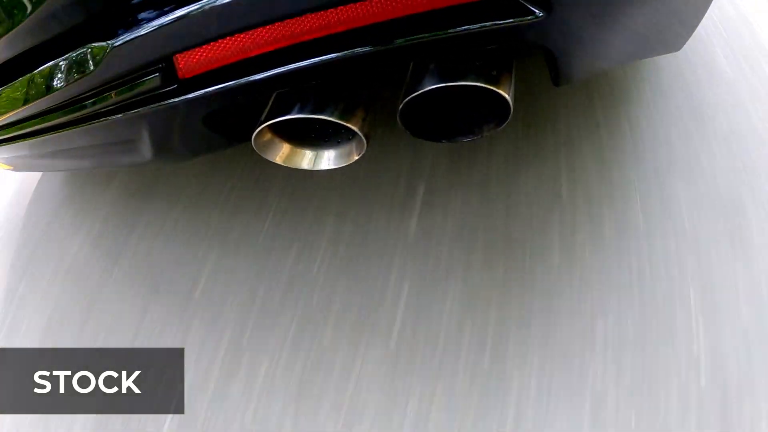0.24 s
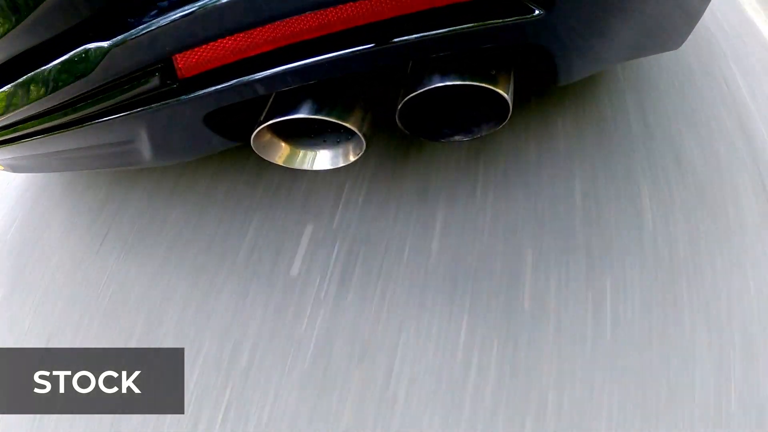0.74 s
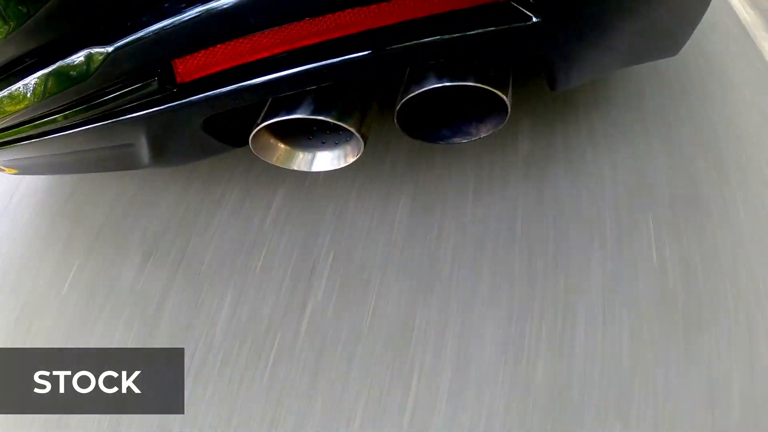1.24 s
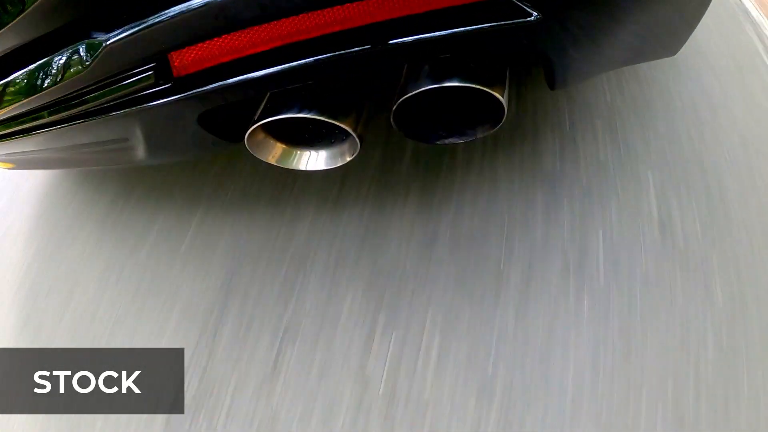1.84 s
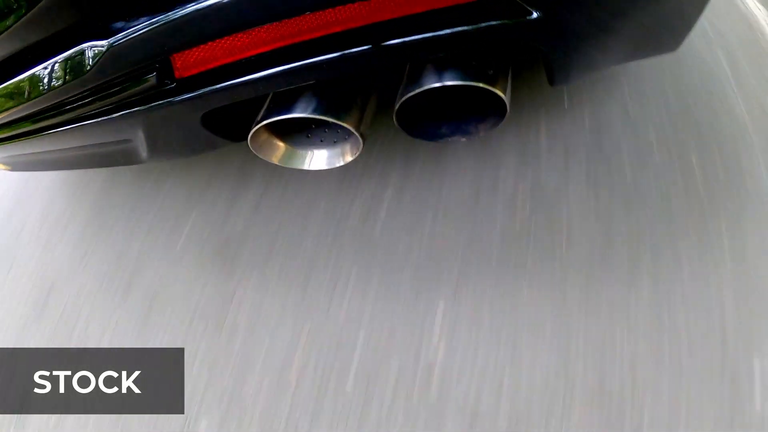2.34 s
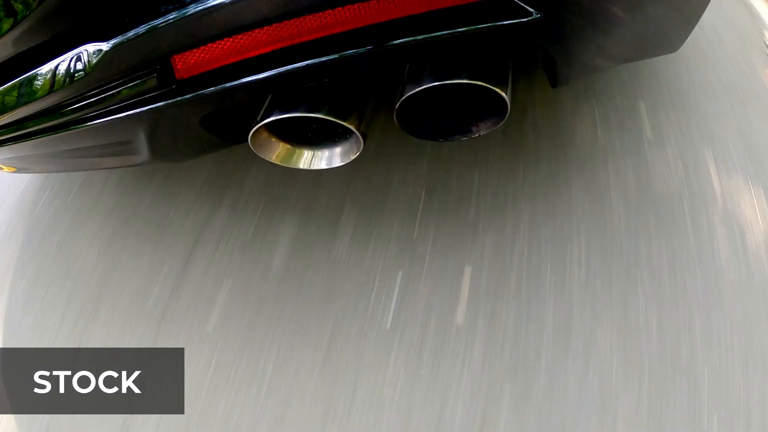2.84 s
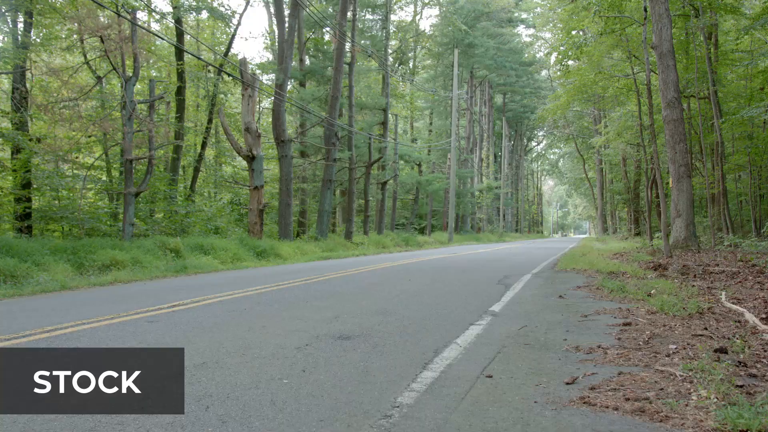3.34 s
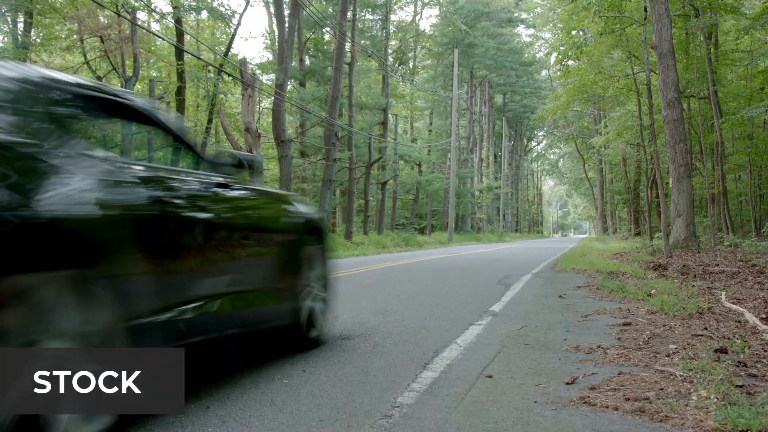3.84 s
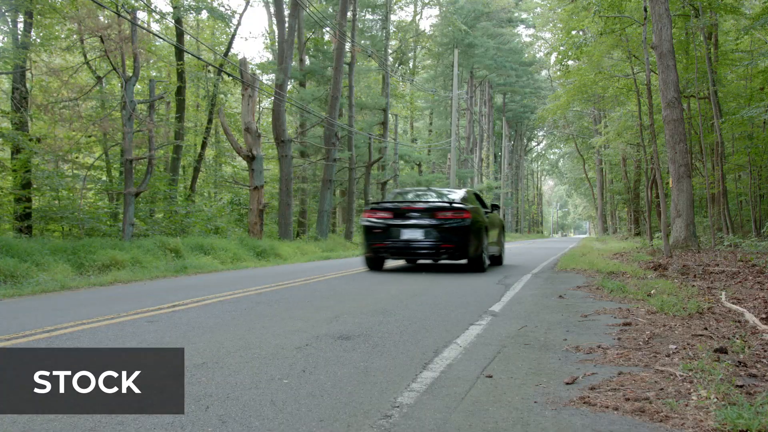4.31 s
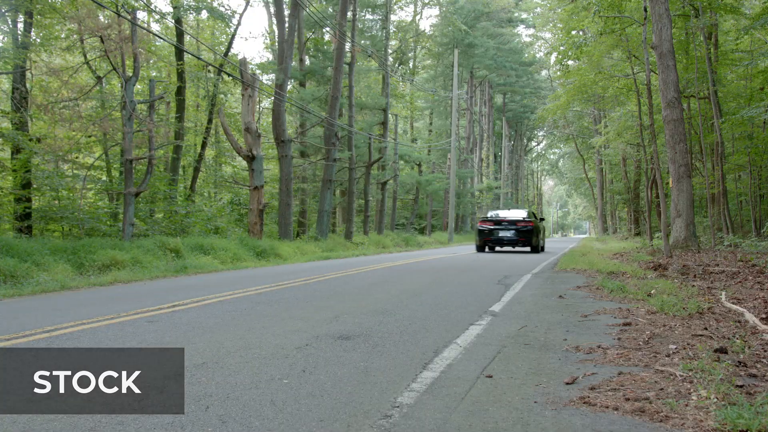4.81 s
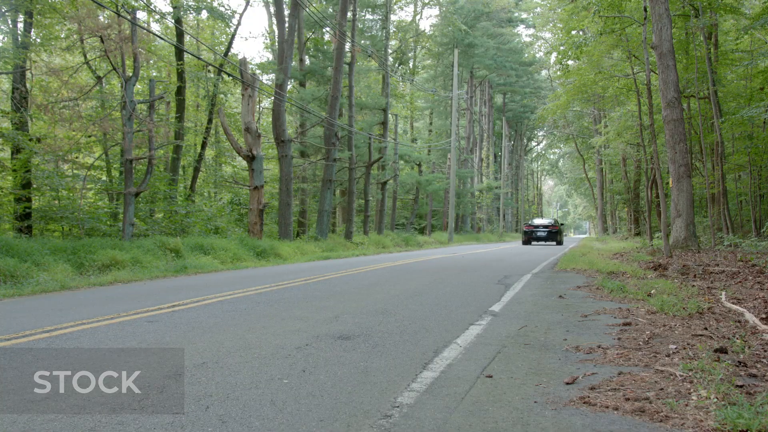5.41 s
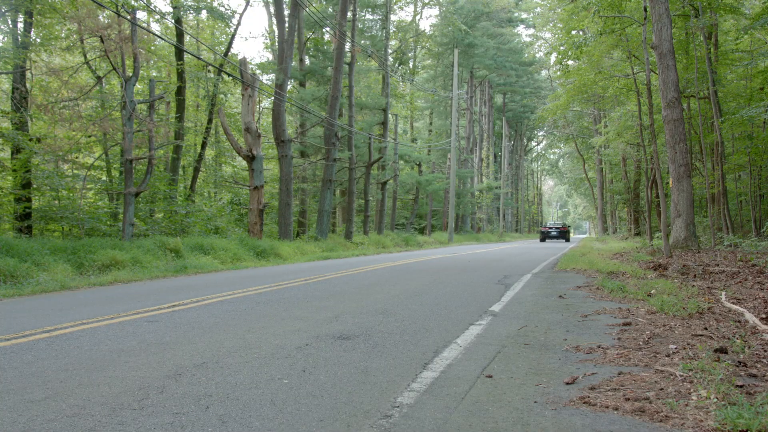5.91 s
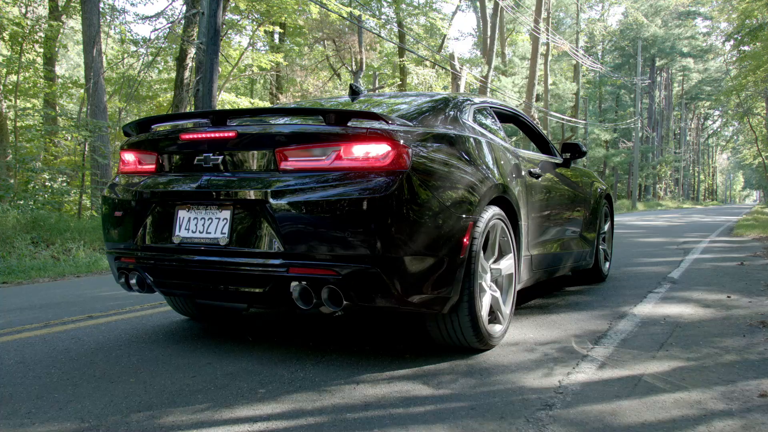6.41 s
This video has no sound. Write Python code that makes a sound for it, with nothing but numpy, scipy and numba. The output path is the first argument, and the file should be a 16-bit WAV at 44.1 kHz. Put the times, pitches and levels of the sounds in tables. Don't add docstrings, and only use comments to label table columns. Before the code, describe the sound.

A V8 sports car roars at its tailpipes through a gear change, then blasts past on a wooded road, shifts, recedes, and cuts to idle.

```python
import sys
import numpy as np
from scipy import signal
from scipy.fft import rfft, irfft, next_fast_len
from scipy.io import wavfile
from scipy.ndimage import uniform_filter1d
from numba import njit

SR = 44100
rng = np.random.default_rng(int(sys.argv[2]) if len(sys.argv) > 2 else 0)


def put_to_file(sound):
    columns = np.atleast_2d(sound).T
    safe = np.clip(columns, -1, 1)
    whole_steps = np.round(safe * 32767)
    wavfile.write(sys.argv[1], SR, whole_steps.astype(np.int16))


def makeup_ratio(level_db):
    decades = np.asarray(level_db, float) / 20
    return 10 ** decades


N = 293706


def coloured(spectrum, x=None):
    x = rng.standard_normal(N) if x is None else x
    size = next_fast_len(len(x), real=True)
    hz, db = np.transpose(spectrum)
    bin_hz = np.arange(size // 2 + 1) * SR / size
    gain = makeup_ratio(np.interp(np.log(bin_hz + 1), np.log(hz), db, left=-90, right=-90))
    y = irfft(rfft(x, size) * gain, size)[:len(x)]
    return y / np.std(y)


def even(x):
    power = uniform_filter1d(uniform_filter1d(x ** 2, size=4000), size=4000)
    return x / np.sqrt(power + 1e-12)


def walk(rate_hz):
    hold = int(SR / rate_hz)
    steps = np.repeat(rng.standard_normal(N // hold + 1), hold)
    return uniform_filter1d(uniform_filter1d(steps, hold), hold)[:N]


def low_pass(x, hz, order=2):
    return signal.sosfilt(signal.butter(order, hz, fs=SR, output="sos"), x)


def high_pass(x, hz, order):
    return signal.sosfilt(signal.butter(order, hz, "high", fs=SR, output="sos"), x)


@njit
def resonator(x, hz, width):
    y, band, low = np.empty(len(x)), 0., 0.
    for i in range(len(x)):
        g, k = np.pi * hz[i] / SR, width[i] / hz[i]
        v = (band + g * (x[i] - low)) / (1 + g * (g + k))
        band, low, y[i] = 2 * v - band, low + 2 * g * v, k * v
    return y


def curves(table, on=slice(0, N)):
    s, *columns = np.transpose(table)
    return [np.interp(np.arange(N)[on] / SR, s, c) for c in columns]


def during(table):
    t = np.arange(N) / SR
    fade_in = np.clip((t - table[0][0]) * 9000 + 1, 0, 1)
    return fade_in * np.clip((table[-1][0] - t) * 9000 + 1, 0, 1)


def peak(s, db, rise_s, fall_s):
    t = np.arange(N) / SR - s
    return makeup_ratio(db - 10 * np.maximum(-t / rise_s, t / fall_s))


def tails(pulses, seconds):
    return even(signal.lfilter([1], [1, -np.exp(-1 / (seconds * SR))], pulses))


# off_s, closing_s, on_s, opening_s, depth (0-1)
FOOT_LIFTS = [
    (.78, .16, 1.42, .26, 1),
    (5.8, .15, 6.44, .01, .6),
]
# centre_s, added_scatter_db, half_length_s
STUMBLES = [
    (.97, .8, .12),
    (1.41, 3.4, .07),
    (3.7, .8, .45),
    (3.98, 2.2, .09),
    (6.1, 1.6, .34),
]


def foot(on):
    t = np.arange(N)[on] / SR
    throttle = np.ones(len(t))
    for off_s, closing_s, on_s, opening_s, depth in FOOT_LIFTS:
        closing = np.clip((t - off_s) / closing_s, 0, 1)
        throttle = throttle - depth * closing * np.clip(1 - (t - on_s) / opening_s, 0, 1)
    scatter_db = 0.45 + 1.1 * (1 - throttle) + 2.0 * (t > AT_IDLE[0][0])
    for s, db, half_s in STUMBLES:
        scatter_db = scatter_db + db * np.clip(1 - np.abs(t - s) / half_s, 0, 1)
    turbulence_db = -16 + 16.5 * np.log10(scatter_db)
    return throttle, scatter_db, turbulence_db


def firings(hz, cylinders, scatter_db, bias=1, twin_db=0):
    count = len(cylinders)
    crank = np.cumsum(count * hz / SR)
    firing = np.arange(1, int(crank[-1]))
    strength_db, lag = np.array(cylinders)[firing % count].T
    chance = rng.standard_normal(N // 50)[firing]
    at = np.interp(firing + lag, crank, np.arange(len(hz)))
    i = np.clip(at.astype(int), 0, len(hz) - 2)
    other_bank = firing % count == count // 2
    size_db = bias * strength_db + scatter_db[i] * chance
    size = makeup_ratio(size_db + (twin_db + 0 * hz)[i] * other_bank)
    return np.bincount(i, size * (i + 1 - at), len(hz)) + np.bincount(i + 1, size * (at - i), len(hz))


HOT_STRETCH = 1.012


def exhaust(pulses, pipe, stretch, turbulence_db, upper=1):
    drive = even(pulses - uniform_filter1d(pulses, size=8000))
    drive = drive + 2 * makeup_ratio(turbulence_db) * rng.standard_normal(len(pulses))
    hot = np.minimum(stretch, HOT_STRETCH)
    ring = 0
    for hz, width_hz, gain in pipe:
        if hz > 600:
            ring = ring + gain * upper * resonator(drive, hz * hot, abs(width_hz) * hot)
        else:
            ring = ring + gain * resonator(drive, hz * stretch, abs(width_hz) * stretch)
    return even(low_pass(low_pass(ring, 1300), 2200, order=4))


def throb(hz, scatter_db):
    pulses = firings(hz, [(0, -0.1)] + [(-60, 0)] * 7, scatter_db)
    centre = 762 * np.minimum((hz / 30) ** .5, HOT_STRETCH)
    width = np.full(len(hz), 120.)
    drone = signal.lfilter(*signal.iirpeak(635, 635 / 30, SR), pulses)
    burst = resonator(resonator(pulses, centre, width), centre, width)
    return low_pass(makeup_ratio(-12) * even(drone) - makeup_ratio(-5.2) * even(burst), 4000, order=4)


SINGING_ORDERS = (20, 24, 26, 33)
# resonance_hz, half_width_hz, level_db
SINGING_RESONANCES = [(525, 35, -14), (625, 28, -6.5), (765, 45, -11.5), (985, 45, -16)]


def singing(hz):
    cycle = 2 * np.pi * np.cumsum(hz) / SR
    out = 0
    for order, (centre_hz, half_hz, db) in zip(SINGING_ORDERS, SINGING_RESONANCES):
        out = out + makeup_ratio(db) * np.sin(order * cycle) / (1 + ((order * hz - centre_hz) / half_hz) ** 2)
    return out


# strength_db, lag (share of the firing gap)
CYLINDERS_COASTING = [(-2.5, 0.0448), (-4.5, -0.051), (-7.5, 0.094), (-7, -0.178), (-8, -0.0865),
                      (-38, 0.21), (-21, -0.15), (-12, 0.211)]
# mode_hz, width_hz, gain (signed)
PIPE_COASTING = [(87.0, 69, 0.86), (190, 255.4, -1.147), (239.3, 57.7, 1.482), (286.7, 16.4, 1.613),
                 (606.4, 512, 0.3484), (681.3, 47.6, -0.79), (782, 10, 0.755)]
# mode_hz, width_hz, gain (signed)
RASP = [(1667.4, 214, 0.986), (2521, 343, -0.637), (3372, 251, 0.43)]
# band_hz, level_db (per Hz)
CRACK = [(2350, -38), (4000, -9.5), (5760, -15), (8920, -1.5), (13700, -15), (15600, -29.5)]


def engine(table, cylinders, pipe, bark, tip, bark_db, heat, law, hiss, puff_s, steady,
           crack_s, crack_scatter_db, dulling, twin=0):
    on = slice(max(int(table[0][0] * SR) - 4000, 0), int(table[-1][0] * SR) + 400)
    hz, db, hiss_db = curves(table, on)
    throttle, scatter_db, turbulence_db = foot(on)
    ceiling_db, crack_db, slope, lift_db, treble_db, rasp_db, bass_hz = law
    crack_db = crack_db + slope * np.minimum(hiss_db - ceiling_db, 0) - lift_db * (1 - throttle)
    stretch = (hz / 30) ** heat

    revs = np.clip(hz - 30, -4, 4) * twin
    high = twin * np.clip((hz - 29.0) / 2.2, 0, 1)
    duck = 1 - 0.82 * high
    pulses = firings(hz, bark, scatter_db, twin_db=-1.3 * revs)
    pulling = exhaust(firings(hz, cylinders, scatter_db), pipe, stretch, turbulence_db, duck)
    if twin:
        pulling = pulling + high * throb(hz, scatter_db) + singing(hz)
    bark_gain = duck * makeup_ratio(bark_db + 1.2 * np.clip(hz - 30, -5, 1))
    pulling = pulling + bark_gain * exhaust(pulses, tip, stretch, turbulence_db)

    coasting = firings(hz, CYLINDERS_COASTING, scatter_db)
    coasting = exhaust(coasting, PIPE_COASTING, (hz / 30) ** .2, turbulence_db)
    coasting = high_pass(coasting, bass_hz, order=2)

    taps = firings(hz, bark, 1.5 + scatter_db, bias=.6)
    rasp = 0
    for mode_hz, width_hz, gain in RASP:
        rasp = rasp + gain * resonator(taps, mode_hz * (hz / 30) ** 0.33, np.full(len(hz), 1. * width_hz))
    rasp = even(rasp)

    gas = (steady + tails(pulses, puff_s)) * coloured(hiss, rng.standard_normal(len(hz)))
    gas = even(gas) * makeup_ratio(1.27 * walk(12)[on])
    treble = makeup_ratio(treble_db - 12.0 * (1 - throttle)) * high_pass(gas, 2500, order=4)
    gas = low_pass(gas, 2348, order=4) + treble

    bursts = tails(firings(hz, bark, crack_scatter_db + scatter_db, bias=0.57), crack_s)
    crack = even(coloured(CRACK, (0.71 + bursts) * rng.standard_normal(len(hz))))
    dull = low_pass(crack, 4500, order=4)
    crack = dull + makeup_ratio(dulling * (crack_db + 48.5)) * (crack - dull)

    out = np.zeros(N)
    out[on] = makeup_ratio(db) * (throttle ** .5 * pulling + (1 - throttle) ** .5 * coasting)
    out[on] += makeup_ratio(hiss_db - 4) * (gas + throttle * makeup_ratio(rasp_db) * rasp)
    out[on] += makeup_ratio(crack_db) * crack
    return out


# time_s, engine_cycle_hz, exhaust_db, gas_rush_db
AT_TAILPIPE = [(0.0, 29.62, -15.5, -27.5), (0.5, 32.85, -13, -22), (0.68, 34.16, -15, -25),
               (0.78, 33.3, -21, -36), (0.86, 33.35, -29.5, -47.5), (0.92, 32.68, -28.5, -45.5),
               (1.01, 31.5, -22.5, -42), (1.07, 30.97, -27.5, -44), (1.38, 26.48, -30.5, -46.5),
               (1.49, 24.63, -33, -48.5), (1.56, 24.81, -25.5, -48), (1.66, 26.64, -19.5, -30.5),
               (1.8, 25.49, -16, -29.5), (1.88, 26.21, -17, -28.5), (2.77, 29.62, -15, -28),
               (2.97, 30.33, -15.5, -26.5), (3.16, 30.5, -21.5, -37.5), (3.28, 30.05, -28, -49)]
# strength_db, lag (share of the firing gap)
CYLINDERS_NEAR = [(-22, -0.11), (2.5, -0.1648), (-2.5, 0.046), (-5.5, -0.046), (-3.5, -0.1098), (0, -0.172),
                  (0.85, -0.0454), (-7.5, -0.0307)]
# mode_hz, width_hz, gain (signed)
PIPE_NEAR = [(106.1, 23.4, 1.5951), (162.1, 26.3, -1.2), (250.4, 127.2, 1.5), (340.28, 36.47, -3),
             (484.3, 19.7, 0.31), (623.6, 32, 0.2866), (682.97, 22, 1.3), (788.1, 36.5, -0.6559),
             (957.3, 236, -0.1834)]
# strength_db, lag (share of the firing gap)
BARK_NEAR = [(-1.5, 0.0199), (-12.5, 0.0776), (-12, 0.0778), (-17, -0.083), (-5.5, 0.0964), (-12.5, 0.0864),
             (-7, -0.03), (-14.5, 0.0424)]
# mode_hz, width_hz, gain (signed)
TIP_NEAR = [(777.2, 46.7, 0.94), (1017.3, 49, -0.23), (631.2, 18.8, 0.433), (1630, 221, 0.193)]
# ceiling_rush_db, ceiling_crack_db, slope (dB per dB below),
# off_throttle_loss_db, hiss_treble_db, rasp_over_hiss_db, coasting_bass_cut_hz
GAS_NEAR = (-23, -50.5, 1.35, 18, -2.5, -4, 30)
# band_hz, level_db (per Hz)
HISS_NEAR = [(620, -29), (1050, -1), (1350, -5.5), (1650, -0.5), (1860, -7.5), (2010, -11.5), (2360, -7),
             (2640, -7), (3040, -13), (3370, -8), (3680, -17), (4210, -14), (4670, -20), (5560, -22.5),
             (7000, -30), (9100, -57), (15400, -120)]


def tailpipe():
    overload = .287
    x = engine(AT_TAILPIPE, CYLINDERS_NEAR, PIPE_NEAR, BARK_NEAR, TIP_NEAR, bark_db=-9, heat=0.558,
               law=GAS_NEAR, hiss=HISS_NEAR, puff_s=0.00294, steady=1.77,
               crack_s=0.001, crack_scatter_db=4.5, dulling=.55, twin=0.92) / overload
    return overload * x / (1 + np.abs(x) ** 10.9) ** (1 / 8.25)


# peak_s, level_db, rise_s (10 dB), fall_s (10 dB)
GUSTS = [(0.55, -38, 1.1, 0.39), (0.96, -45, 0.07, .3), (1.37, -35, 0.26, 0.17), (1.68, -46, 0.5, 0.4),
         (2.3, -49, 0.7, 0.3), (2.62, -50, 0.83, 0.05), (3.22, -45, 0.4, 0.06), (3.93, -32.5, .07, 0.12),
         (4.1, -50.5, 0.04, 0.3), (6.64, -49, 0.28, 0.58)]
# band_hz, level_db (per Hz)
WIND = [(11, -45.5), (18, -2), (54, 11), (151, -24.5), (200, -8), (260, -22), (440, -120)]


def wind():
    level = makeup_ratio(-77) + sum(peak(*gust) for gust in GUSTS)
    return level * makeup_ratio(-6 + 3.5 * walk(10)) * coloured(WIND)


def sweep(swells, width_hz):
    out, start = np.zeros(N), int(AT_ROADSIDE[0][0] * SR)
    for s, hz, db, rise_s, fall_s in swells:
        band = signal.iirpeak(hz, hz / width_hz, SR)
        roar = signal.lfilter(*band, signal.lfilter(*band, rng.standard_normal(N)[start:]))
        out[start:] += peak(s, db - 3.0, rise_s, fall_s)[start:] * even(roar)
    return out


# time_s, engine_cycle_hz (as heard), exhaust_db, tyre_and_gas_rush_db
AT_ROADSIDE = [(3.28, 39.62, -39.5, -48.5), (3.61, 39.01, -41, -39.5), (3.72, 36.1, -30.5, -35),
               (3.78, 34.8, -26.5, -27), (3.95, 32.38, -22, -27.5), (4.075, 24.9, -22.5, -31),
               (4.125, 26.9, -17, -20.5), (4.19, 27.6, -17, -22), (4.27, 26.19, -21.5, -29.5),
               (4.35, 27, -17.5, -28), (4.43, 27.04, -21.5, -31.5), (4.54, 27.16, -21, -33.5),
               (5.12, 29.18, -23.5, -38), (5.66, 31.04, -26, -39), (5.79, 29.91, -33.5, -42.5),
               (5.88, 30.65, -44.5, -42.5), (6.02, 29.48, -39, -44), (6.445, 24.91, -54.5, -57)]
# strength_db, lag (share of the firing gap)
CYLINDERS_FAR = [(-19.5, -0.064), (-2, 0.1354), (-1.5, -0.063), (-4, 0.1495), (-3, 0.093), (-4, -0.0396),
                 (-1.5, -0.0513), (0.0, 0.084)]
# mode_hz, width_hz, gain (signed)
PIPE_FAR = [(138.6, 54.4, -0.742), (241, 206, -0.703), (358.2, 61.9, 1.457), (462.2, 26.2, 1.455),
            (612, 56.3, 0.331), (700.6, 54, -0.513)]
# strength_db, lag (share of the firing gap)
BARK_FAR = [(-17.5, -0.01), (-4.5, 0.0747), (-16.5, 0.17), (-19, -0.066), (-10.5, 0.088), (-14.5, 0.037),
            (-21, -0.015), (-0.5, 0.068)]
# mode_hz, width_hz, gain (signed)
TIP_FAR = [(550, 164, 0.72), (690.4, 73, 0.265)]
GAS_FAR = (-27.5, -52.5, 0.9, 26, -0.29, -18, 171.5)
# band_hz, level_db (per Hz)
HISS_FAR = [(470, -26.5), (800, -1), (1200, -3), (1550, -5.5), (1760, -10), (2290, -10), (2560, -12),
            (4960, -21), (7000, -30), (9100, -51.5), (15400, -120)]
# peak_s, centre_hz, level_db, rise_s (10 dB), fall_s (10 dB)
SWELLS_LOW = [
    (3.44, 190, -43, .15, .15),
    (3.76, 293, -34.5, 0.3, 0.13),
    (3.885, 288, -18, 0.0561, .1),
    (4.0, 310, -17.5, 0.1473, .05),
]
SWELLS_HIGH = [
    (3.91, 550, -23, .1, .07),
    (4.03, 442, -15, .07, 0.0264),
    (4.15, 665, -16, .07, .15),
    (4.38, 460, -31, 0.083, .12),
]
# peak_s, centre_hz, level_db, rise_s (10 dB), fall_s (10 dB)
TYRE_HISS = [
    (3.45, 8800, -69, .5, .9),
    (3.8, 13800, -64, .08, .5),
    (4.01, 13800, -65, .1, .06),
    (4.17, 13800, -63, .12, .2),
]
# peak_s, centre_hz, level_db, rise_s (10 dB), fall_s (10 dB)
TYRE_ROAR = [
    (5.95, 1220, -48, .25, .35),
]
# band_hz, level_db (per Hz)
WOODS = [(24, -62), (40, -39), (268, -10), (322, -19.5), (422, -1.5), (462, -8), (779, -11.5), (1170, -9),
         (1400, -12), (1840, -19), (9000, -57), (11700, -92), (19800, -120)]


def roadside():
    x = engine(AT_ROADSIDE, np.roll(CYLINDERS_FAR, shift=4, axis=0), PIPE_FAR,
               np.roll(BARK_FAR, shift=4, axis=0), TIP_FAR, bark_db=-7, heat=0.259,
               law=GAS_FAR, hiss=HISS_FAR, puff_s=0.0067, steady=2.5,
               crack_s=0.0068, crack_scatter_db=1.4, dulling=0.905)
    x = x + sweep(SWELLS_LOW, 60.) + sweep(SWELLS_HIGH, 200.)
    x = x + sweep(TYRE_HISS, 3500.) + sweep(TYRE_ROAR, 700.)
    x = x * during(AT_ROADSIDE)
    t = np.arange(SR) / SR
    echo = rng.standard_normal(SR) * makeup_ratio(-60 * t / 0.987) * np.clip((t - .015) / 0.0306, 0, 1)
    echo = low_pass(echo, 2500)
    trees = signal.fftconvolve(x, echo / np.sqrt(np.sum(echo ** 2)))[:N]
    hush = coloured(WOODS) * makeup_ratio(1.16 * walk(3.0))
    return x + makeup_ratio(-22.5) * trees + makeup_ratio(-44) * hush


# start_s, level_db, pitch_hz, decay_60db_s
CHIRPS = [
    (5.85, -61, 7200, .12),
    (6.32, -72, 7056, 0.04956),
]


def bird():
    t, out = np.arange(N) / SR, 0
    for start_s, db, hz, t60_s in CHIRPS:
        band = signal.lfilter(*signal.iirpeak(hz, 7., SR), rng.standard_normal(N))
        level = makeup_ratio(db - 60 * np.abs(t - start_s) / t60_s) * (t > start_s)
        out = out + level * band / np.std(band)
    return out


# start_s, level_db
SPLICES = [
    (6.4443, -47),
]


def splices():
    out = np.zeros(N)
    for s, db in SPLICES:
        out[int((s + .001) * SR)] = makeup_ratio(db + 7)
    return low_pass(out, 7000, order=1)


# time_s, engine_cycle_hz, exhaust_db, gas_rush_db
AT_IDLE = [(6.446, 10.7, -34.5, -50.5), (6.55, 11.2, -35, -51.5), (6.66, 9.6, -36, -51.5)]
# strength_db, lag (share of the firing gap)
CYLINDERS_IDLE = [(-6.5, 0.137), (-2.5, -0.0688), (-1, 0.057), (-4.5, 0.16), (1.5, -0.081), (-6.5, .14),
                  (0, -0.0816), (-5, 0.104)]
# mode_hz, width_hz, gain (signed)
PIPE_IDLE = [(76.2, 8.1, 3), (195, 24.7, -0.87), (290.4, 32.7, 1.14), (353.5, 50, -0.56),
             (415.4, 39.6, 0.52), (519.4, 23.5, 0.41)]
GAS_IDLE = (-52.5, -68, -0.07, 0.1, 0.7, -19, 30.5)


def idle():
    x = engine(AT_IDLE, CYLINDERS_IDLE, PIPE_IDLE, CYLINDERS_IDLE, TIP_FAR, bark_db=-38, heat=0,
               law=GAS_IDLE, hiss=HISS_FAR, puff_s=0.0057, steady=2.1,
               crack_s=.002, crack_scatter_db=2.8, dulling=.1)
    return low_pass(x, 797.6, order=1)


def scene():
    mix = during(AT_TAILPIPE) * tailpipe()
    mix = mix + during(AT_ROADSIDE) * roadside()
    mix = mix + during(AT_IDLE) * idle()
    return (mix + bird() + wind() + splices())[None]


def top_cut(x):
    return signal.sosfilt(signal.butter(12, 15730, fs=SR, output="sos"), x)


def record(dry):
    self_noise = makeup_ratio(-85) * low_pass(rng.standard_normal(N), 9500, order=4)
    return top_cut(dry + self_noise)


dry = scene()
out = record(dry)
put_to_file(out)
```